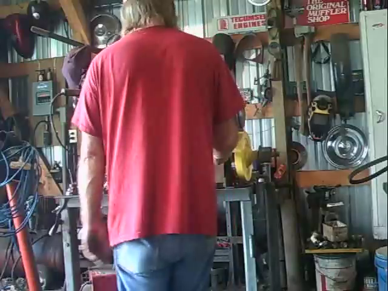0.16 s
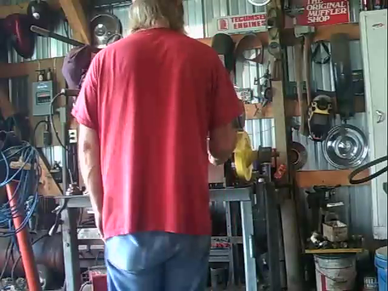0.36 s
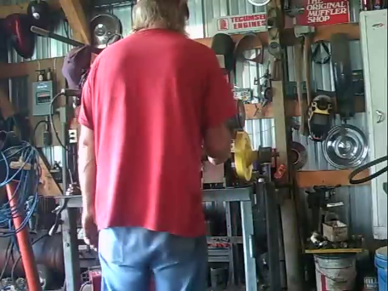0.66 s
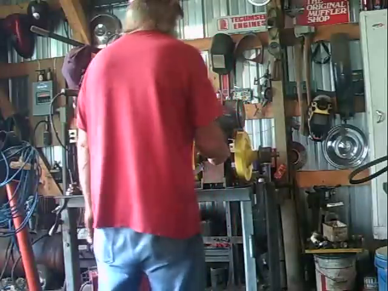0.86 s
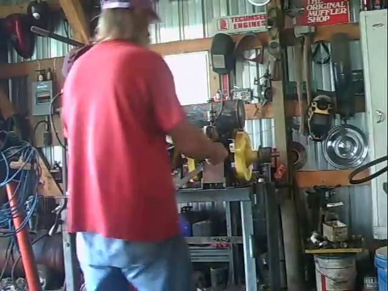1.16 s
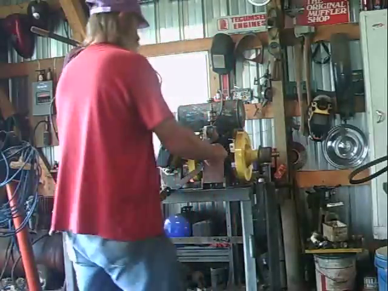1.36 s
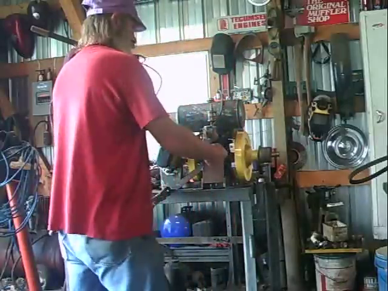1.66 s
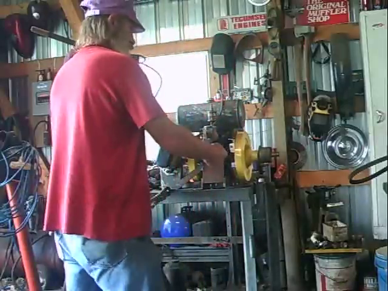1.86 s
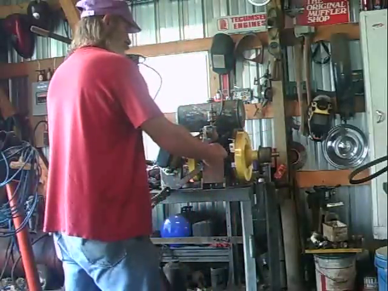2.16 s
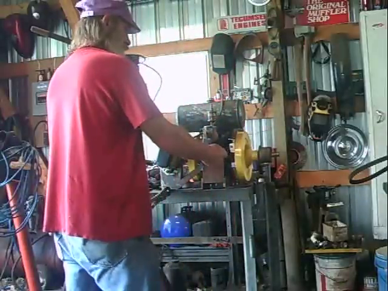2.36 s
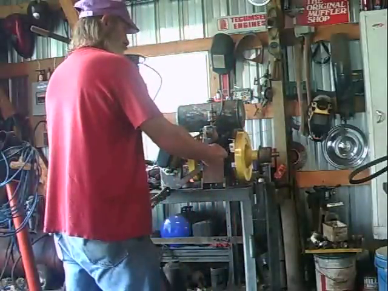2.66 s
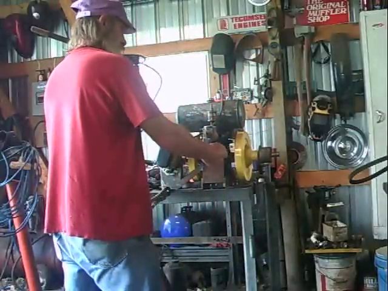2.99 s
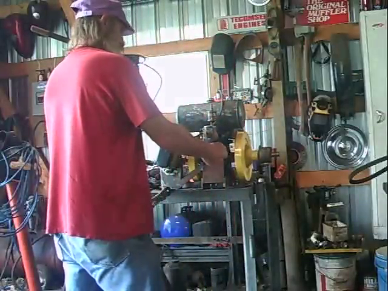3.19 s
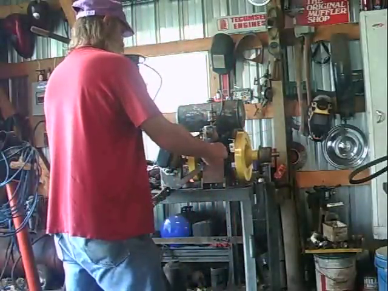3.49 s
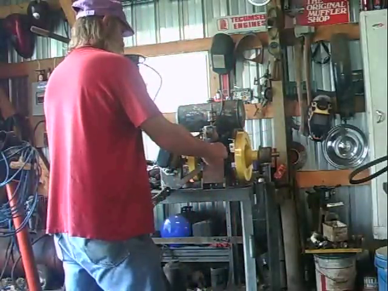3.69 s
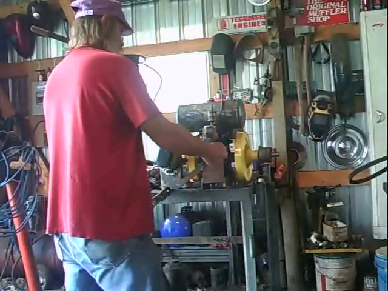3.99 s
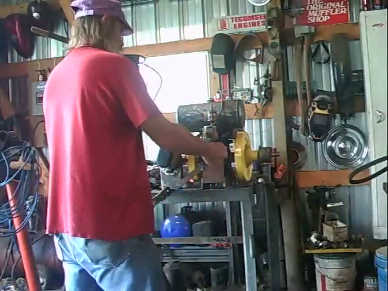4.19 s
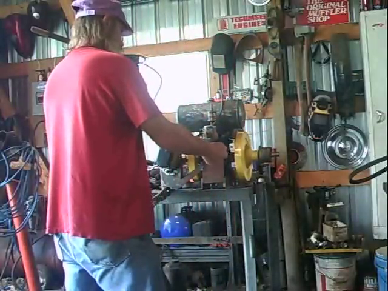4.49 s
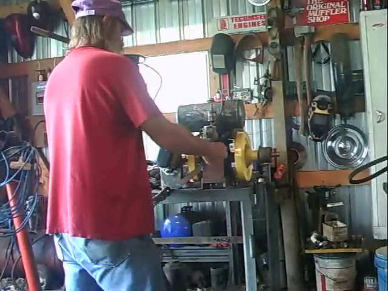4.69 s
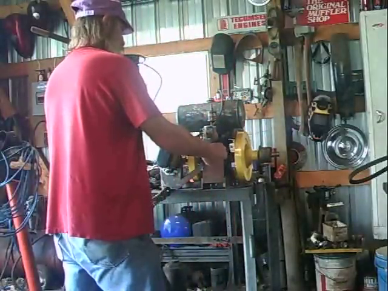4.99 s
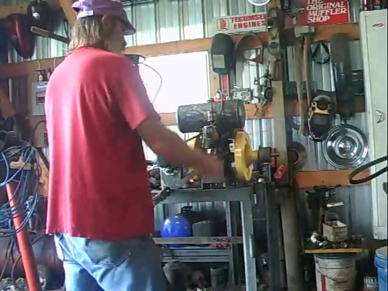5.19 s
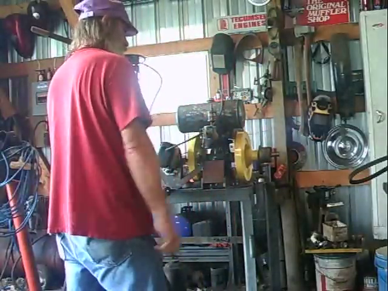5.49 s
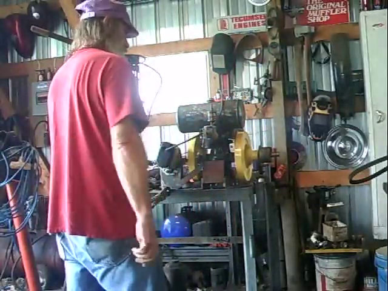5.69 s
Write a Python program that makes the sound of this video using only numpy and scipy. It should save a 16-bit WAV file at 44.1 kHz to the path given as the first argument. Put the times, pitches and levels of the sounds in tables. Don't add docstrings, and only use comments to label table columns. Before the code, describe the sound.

An old small flywheel engine coasts in a sheet-metal shop, with fast cyclic clatter, low puffs and airy hiss. Ten uneven firings bang out hollowly, first spaced wide and then closer, each echoing off the walls. Two light metal knocks come just before the third bang. The cheap, dull microphone distorts and crackles on the blasts.

```python
import sys
import numpy as np
from scipy import signal
from scipy.fft import rfft, irfft, next_fast_len
from scipy.io import wavfile
from scipy.ndimage import map_coordinates

SR = 44100
rng = np.random.default_rng(int(sys.argv[2]) if len(sys.argv) > 2 else 0)


def how_loud(loudness_db):
    steps = np.asarray(loudness_db, float) / 20
    return 10 ** steps


def inscribe(sig):
    pcm = np.round(np.clip(np.atleast_2d(sig).T, -1, 1) * 32767)
    wavfile.write(sys.argv[1], SR, pcm.astype(np.int16))


N = 257984


def unit(x):
    return x / np.sqrt(np.mean(x ** 2) + 1e-20)


def along(points, hz):
    f, v = np.transpose(points)
    return np.interp(np.log(hz + 1), np.log(f + 1), v)


def wobble(rate):
    return map_coordinates(rng.standard_normal(N // 100), [np.arange(N) * rate / SR])


def filtered(x, response):
    m = next_fast_len(len(x) + 8192)
    return irfft(rfft(x, m) * response(np.fft.rfftfreq(m, 1 / SR)), m)[:len(x)]


def resonance(f, hz, width):
    return 1j * f * width / (hz * hz - f * f + 1j * f * width)


def tilt(f, db):
    return how_loud(db * np.log2((f + 20) / 800))


def train(times, db):
    inside = (times >= 0) & (times < N / SR)
    samples = (times[inside] * SR).astype(int)
    return np.bincount(samples, how_loud(db)[inside], N)


# frequency in Hz, time to decay by 60 dB in seconds.
SHOP_DECAY = [(60, 0.94), (200, 0.95), (400, 0.92), (850, 0.75), (1300, .85), (2000, 0.99), (3800, 0.55)]


def echoing(noise, stretch, rise, hold=0):
    hz, t, z = signal.stft(noise, SR, nperseg=256)
    t60 = stretch * along(SHOP_DECAY, hz)[:, None]
    fading_db = -60 * np.maximum(t - hold, 0) / t60
    tail = signal.istft(z * how_loud(fading_db), SR, nperseg=256)[1][:SR]
    onset = 1 - np.exp(-(np.arange(SR) / (rise * SR)) ** 2)
    return tail * onset


TURNS_BETWEEN = [2, 10, 6, 4, 8, 8, 5, 6, 1, 5, 1]


def flywheel():
    first_s, last_s = -.025, 5.9
    coast_per_s = .25
    port_lag_s = .014
    usual_speed = 9
    marks = np.array([first_s, *np.transpose(FIRINGS)[0], last_s])
    lost = np.repeat(1 - np.exp(-coast_per_s * np.diff(marks)), TURNS_BETWEEN)
    done = np.concatenate([np.arange(n) / n for n in TURNS_BETWEEN])
    top = np.repeat(marks[:-1], TURNS_BETWEEN) - np.log(1 - done * lost) / coast_per_s
    opening = np.append(top, last_s) + port_lag_s
    return opening, -np.log2(usual_speed * np.gradient(opening))


# time in seconds, change of level in dB.
SHADE = [(0, -2), (.45, -0.2), (1.1, -0.15), (1.7, 1.2), (2.2, 0.7), (2.7, 0.2), (4, -0.3), (5.85, 1)]


def shade():
    return np.interp(np.arange(N) / SR, *np.transpose(SHADE))


# frequency in Hz, density in dB per Hz.
HISS = [(25, -33), (70, -24), (150, -20), (330, -10), (580, -16), (900, -13.5), (1250, -16.5),
        (2000, -22.5), (2700, -27.5), (3200, -34.5), (3750, -26.5), (3950, -45.5), (5000, -87)]


def hiss():
    t = np.arange(N) / SR
    opening, faster = flywheel()
    level_db = -20.5 + 10.5 * np.interp(t, opening, faster) + shade()
    turns = np.interp(t, opening, np.arange(len(opening)))
    beat_db = 1.5 * np.cos(2 * np.pi * (turns - .15))
    air = rng.standard_normal(N) * how_loud(beat_db + .8 * wobble(14) + 1.2 * wobble(150))
    return how_loud(level_db - 5.0) * unit(filtered(air, lambda f: how_loud(along(HISS, f))))


# frequency in Hz, level over the casing in dB, decay by 60 dB in seconds, crank angle in turns.
STAND_RINGS = [(324.9, -9, .3, 0.49), (778.5, -15, 0.38, .7)]


def stand(opening):
    turn, t, out = np.arange(len(opening)), np.arange(SR // 2) / SR, np.zeros(N)
    for hz, db, t60, angle in STAND_RINGS:
        blows = train(np.interp(turn + angle, turn, opening), 1.8 * rng.standard_normal(len(turn)))
        swelling = 1 - np.exp(-t / .008)
        ring = np.sin(2 * np.pi * hz * t) * how_loud(-60 * t / t60) * swelling
        out += how_loud(db) * unit(signal.fftconvolve(blows, ring)[:N])
    return out


# crank angle in turns, level in dB.
KNOCKS = [(.02, 0), (.22, -2.5), (.37, 1), (.58, 3), (.74, -2), (0.881, -5)]


def knocks(opening):
    turn, wet = np.arange(len(opening)), []
    for angle, db in KNOCKS:
        play = rng.standard_normal((len(turn), 2))
        times = np.interp(turn + angle + .012 * play[:, 0], turn, opening)
        hits = train(times, db + 2.0 * play[:, 1])
        answer = echoing(rng.standard_normal(SR), 0.58, rise=0.00092)
        wet.append(hits + .65 * signal.fftconvolve(hits, answer / np.linalg.norm(answer))[:N])
    return wet


# frequency in Hz, width in Hz, level in dB, crank angle of the blow in turns, beat depth in dB.
CASING_MODES = [(174.8, 23, -8, 0.29, 3.5), (215.1, 14, -3.5, 0.082, 15.5), (263.4, 25, -4.5, 0.36, 15.5),
                (325.2, 12, 0.2, 0.79, 3.5), (383, 32, -7.5, 0.98, 11), (404.8, 48, -7, 0.87, 4.5),
                (508.2, 17, -7, 0.013, -5), (767.8, 18, -5, 0.71, 10), (975, 40, -17, 0.82, -2.5),
                (1110, 17, -29.5, 0.79, -11.5), (1270.4, 110, -10, .1, -2), (1312.6, 32, -9.5, 0.79, -5),
                (1414, 280, -16.5, 0.54, -15.5), (1664, 25, -14.5, 1, 3.5), (2970, 10, -11, 0.09, -2.5),
                (3178, 280, -21, 0.1, 15), (3580, 260, -32.5, 0.24, -1.5)]


def casing():
    opening, faster = flywheel()
    wet = knocks(opening)
    faster = np.interp(np.arange(N) / SR, opening, faster)
    level_db = -21.5 + 2 * faster + shade()
    bright_db = -0.56 + 1.2 * faster
    angles, rattle = np.transpose(KNOCKS)[0], np.zeros(N)
    for hz, width, db, lag, depth_db in CASING_MODES:
        favour = how_loud(depth_db * np.cos(2 * np.pi * (angles - lag)))
        blows = favour * rng.choice([-1, 1], len(angles)) @ wet
        rubbing = (.3 + hz / 1800) * rng.standard_normal(N)
        ring = unit(filtered(unit(blows) + rubbing, lambda f: resonance(f, hz, 1.4 * width) ** 2))
        rattle += how_loud(db + bright_db * np.log2(hz / 800)) * ring * np.sqrt(width)
    return how_loud(level_db - 4.7) * unit(rattle) + how_loud(level_db) * stand(opening)


# frequency in Hz, density in dB per Hz.
PUFF = [(20, -29.5), (35, -8), (60, -11.5), (95, 2), (130, 5.5), (180, -32)]
# delay in seconds, frequency in Hz, level in dB, decay by 60 dB in seconds.
PUFF_PARTS = [(0, 68, -1.5, 0.13), (.042, 97.5, -4.5, 0.075)]


def puffs():
    lead_s = .011
    low_hz = 45
    opening, faster = flywheel()
    t, out = np.arange(SR // 5) / SR, np.zeros(N)
    for delay, hz, db, t60 in PUFF_PARTS:
        times = opening - lead_s + delay * 2 ** -faster
        level_db = db + 4 * faster + 4 * rng.standard_normal(len(opening))
        blows = train(times, level_db)
        fading = how_loud(-60 * t / t60)
        same = signal.fftconvolve(blows, fading * np.sin(2 * np.pi * hz * t))[:N]
        fresh = signal.fftconvolve(blows, fading)[:N] * rng.standard_normal(N)
        out += same + how_loud(13.5) * filtered(fresh, lambda f: how_loud(along(PUFF, f)))
    return how_loud(-36.5) * unit(filtered(out, lambda f: 1j * f / (low_hz + 1j * f)))


# start in seconds, level in dB.
CLANKS = [
    (2.278, -15),
    (2.321, -9.5),
]
# frequency in Hz, density in dB per Hz.
CLANK_SPECTRUM = [(300, -32), (500, 2), (750, -17), (1100, -5.5), (1650, -8), (2100, -9.5), (3000, -10.5),
                  (3900, -26.5)]


def clanks():
    out = np.zeros(N + SR)
    for s, db in CLANKS:
        tail = echoing(rng.standard_normal(SR), 0.56, rise=0.00099)
        ring = filtered(tail, lambda f: how_loud(along(CLANK_SPECTRUM, f)))
        out[round(s * SR):][:SR] += how_loud(db) * ring / np.std(ring[:SR // 20])
    return out[:N]


# start in seconds, level in dB, pipe note in Hz, pipe note level in dB, decay stretch as a ratio.
FIRINGS = [
    (0.2269, -11.5, 807, -3, 0.81),
    (1.4908, -10.5, 781, 8, 0.6),
    (2.3653, -9.5, 857, -0.5, 0.67),
    (2.838, -8, 843, -3.5, 0.75),
    (3.6655, -8.5, 842, 1.5, 0.76),
    (4.445, -10, 877, -2.5, 0.8),
    (4.898, -7, 876.5, -0.5, 0.77),
    (5.381, -8, 831.5, 0.5, 1.005),
    (5.462, -12, 748, 4.5, 0.31),
    (5.827, -10.5, 946, 7.5, 0.69),
]
# frequency in Hz, density in dB per Hz.
BLAST = [(18, -58.5), (30, -12.5), (261, -3.5), (334, -1), (655, -15), (854, 0), (946, -7.5), (1160, -6),
         (1370, -16), (1680, -15), (2370, -23), (3220, -18.5), (3950, -43.5), (5140, -64), (8690, -120)]
# frequency in Hz, width in Hz, level in dB.
PANELS = [(208.2, 24, 6), (330.6, 20, 6.5), (371.8, 27, 7), (416.2, 25, 4), (536, 28, 10.5),
          (771.6, 37, 5.5), (812.4, 31, -1.5), (876, 18, 5.5), (1040, 51, 8), (1180, 25, 6),
          (1704.5, 35, 5.5), (1939, 18, -4)]


def bangs():
    out, walls, t = np.zeros(N + SR), rng.standard_normal(SR), np.arange(SR) / SR
    for s, db, note_hz, note_db, stretch in FIRINGS:
        noise = 0.54 * walls + 0.88 * rng.standard_normal(SR)
        tail = echoing(noise, 0.79 * stretch, rise=.003, hold=0.054 * stretch)

        def response(f):
            panels = 1 + sum(how_loud(g) * resonance(f, hz, w) for hz, w, g in PANELS)
            note = how_loud(note_db - 1.5) * resonance(f, note_hz, 130)
            return (panels + note) * tilt(f, 1.71) * how_loud(along(BLAST, f))

        blast = filtered(tail, response)
        direct = -np.sin(2 * np.pi * note_hz * t) * how_loud(-60 * t / .04)
        out[round(s * SR):][:SR] += how_loud(db + 9) * (direct + blast / np.std(blast[:SR // 10]))
    return out[:N]


def scene():
    return (hiss() + casing() + puffs() + clanks() + bangs())[None]


def roll_off(x):
    return signal.sosfilt(signal.butter(12, 15900, fs=SR, output="sos"), x)


def record(dry):
    fine_block, coarse_block = 441, 80
    ceiling, knee = .64, 13
    coupling_hz = 125.5
    overflow, full_scale = .695, .705
    blocks = N // fine_block + 2
    fine, coarse = blocks * fine_block, blocks * coarse_block
    driven = dry[0] / (1 + np.abs(dry[0] / ceiling) ** knee) ** (1 / knee)
    driven = filtered(driven, lambda f: 1j * f / (coupling_hz + 1j * f))
    low = irfft(rfft(driven, fine)[:coarse // 2 + 1], coarse) * coarse_block / fine_block
    held = np.where(np.abs(low) > overflow, 0, low)
    hz = np.fft.rfftfreq(fine, 1 / SR)
    mirrored = np.resize(np.fft.fft(held), len(hz))
    edge = np.cos(np.pi / 2 * np.clip((hz - 3500) / 1050, 0, 1)) ** 2.2
    full = irfft(mirrored * edge, fine)[:N] * fine_block / coarse_block
    return roll_off(np.clip(full, -full_scale, full_scale)[None])


dry = scene()
out = record(dry)
inscribe(out)
```